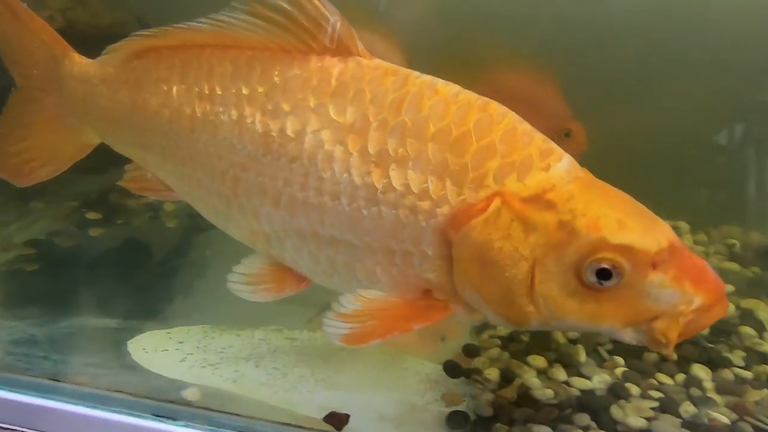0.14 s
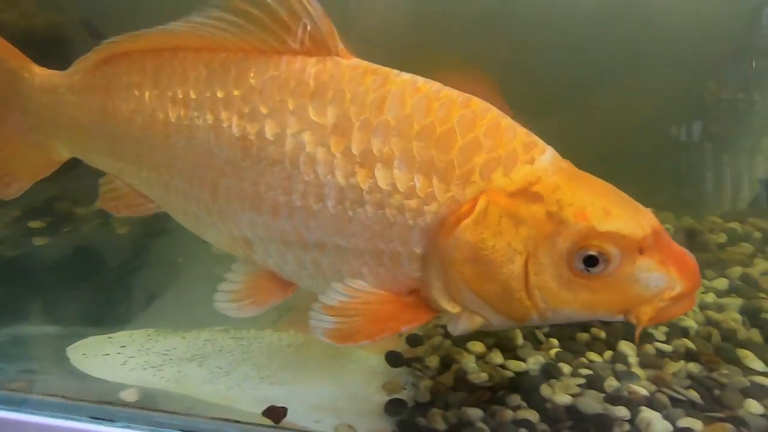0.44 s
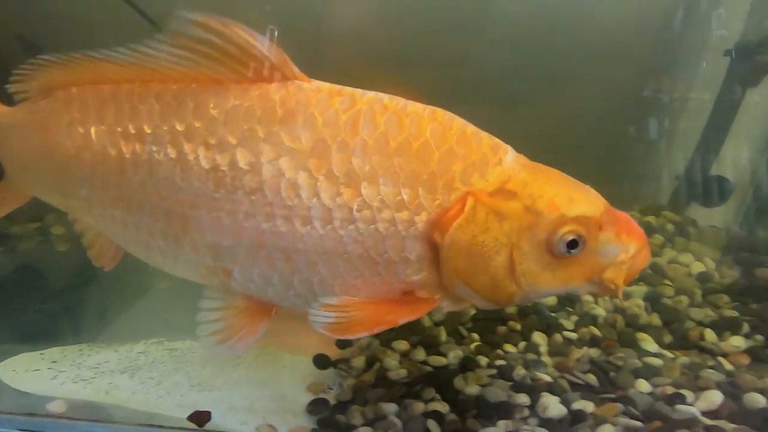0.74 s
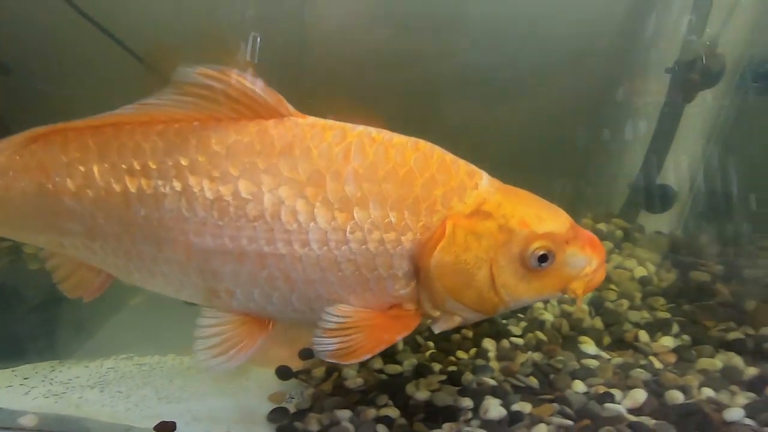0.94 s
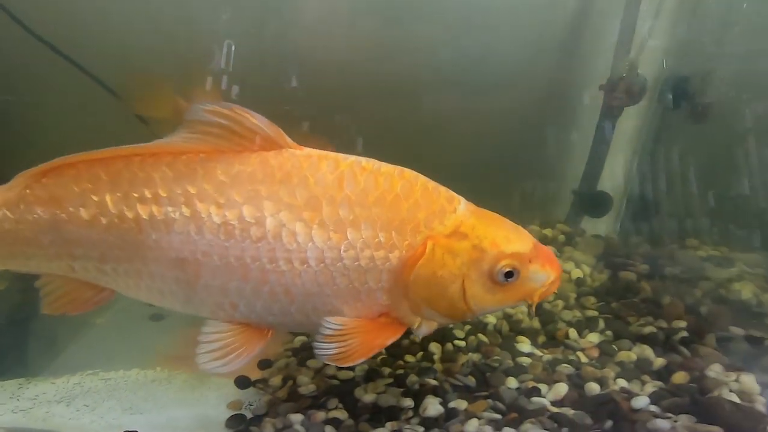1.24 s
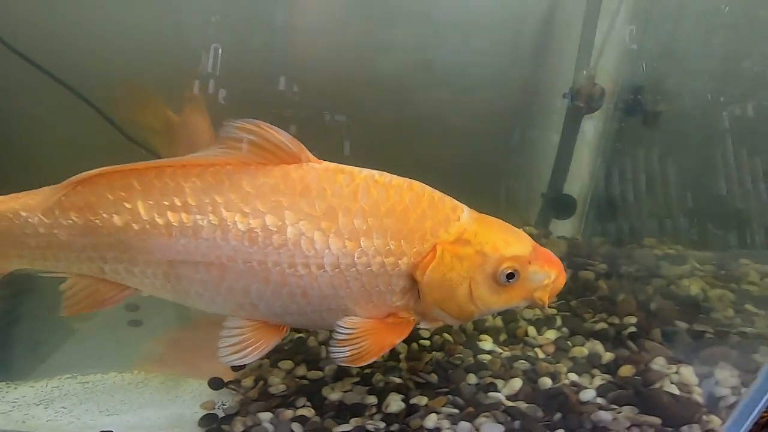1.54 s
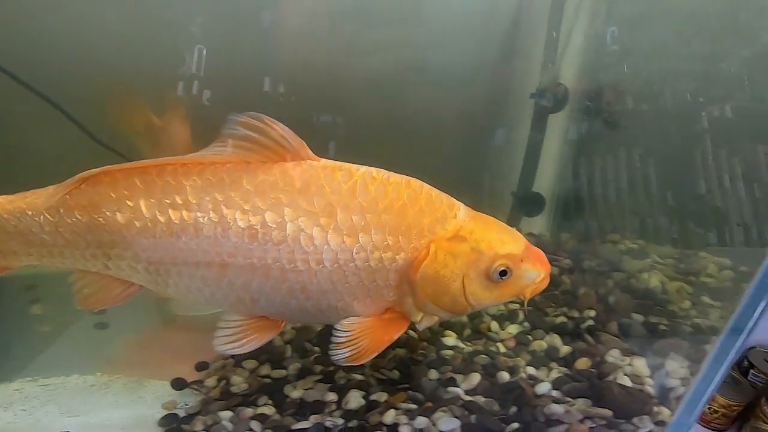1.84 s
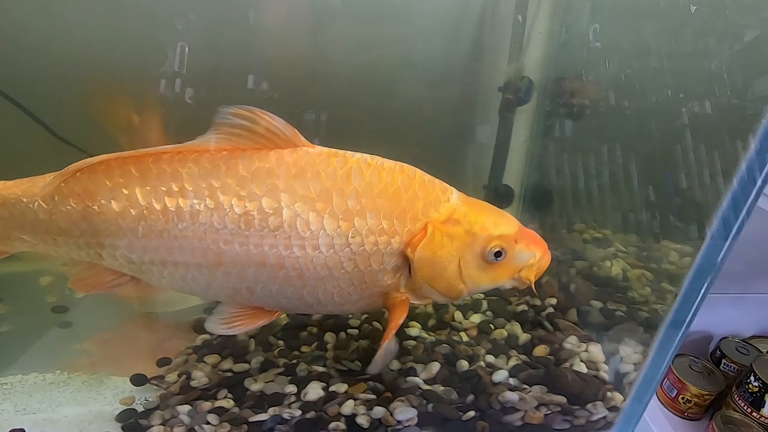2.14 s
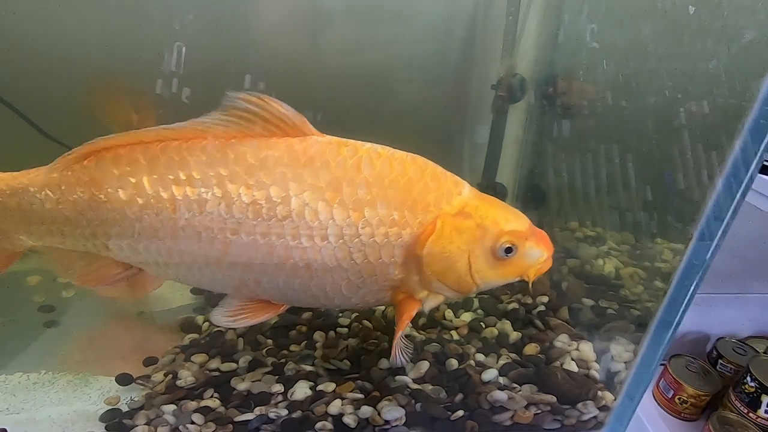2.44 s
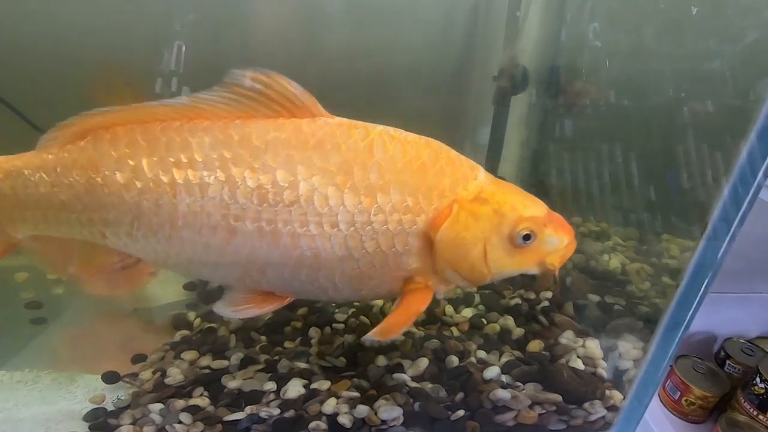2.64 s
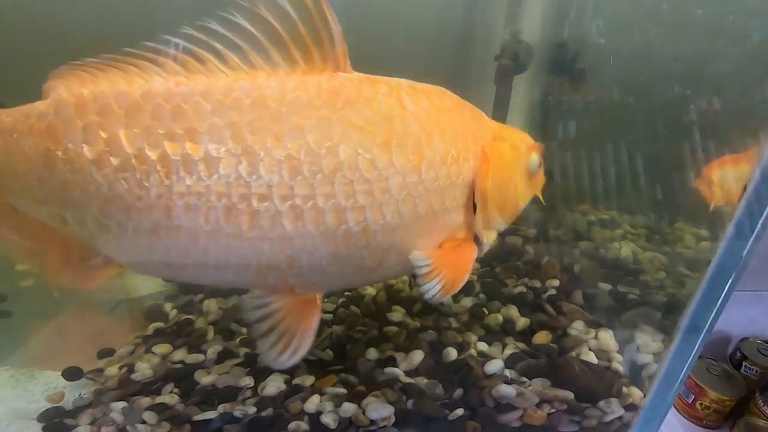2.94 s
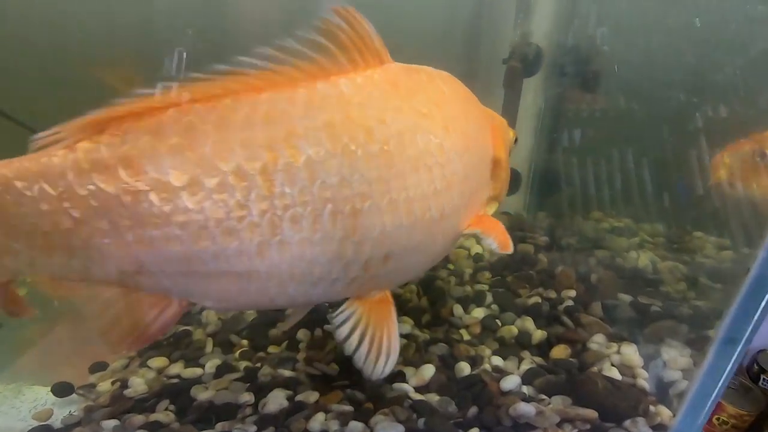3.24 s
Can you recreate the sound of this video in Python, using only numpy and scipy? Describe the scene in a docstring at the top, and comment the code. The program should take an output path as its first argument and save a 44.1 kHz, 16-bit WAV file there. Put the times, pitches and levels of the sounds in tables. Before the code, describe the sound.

Aquarium water bubbles steadily, with low gurgles and small plips at the surface, over an air pump's low hum and a faint hiss. A low drone fades early, and one soft thump comes near the end.

```python
"""A steady hum is heard first: an aquarium air pump vibrating at multiples of the mains rate, with its
motor turning underneath. Bubbles ring as small oscillators: large ones gurgle low in the tank, small
ones patter at the surface and, like the drops, excite the modes of the air space above the water.
Air hisses in step with the pump and whistles faintly now and then. A low drone sinks away in the first
second, with a tiny tick as it fades; one soft thump comes near the end."""
import sys
import numpy as np
from scipy import signal
from scipy.fft import rfft, irfft
from scipy.io import wavfile

SR = 44100
rng = np.random.default_rng(int(sys.argv[2]) if len(sys.argv) > 2 else 0)


def transcribe(u):
    """Save the signal u as a 16-bit wav file named by the first command-line argument.

    u: samples, shape (n,) or (channels, n), limited to [-1, 1]; the rate is SR.
    q: integer samples, one column per channel.
    """
    v = np.clip(np.atleast_2d(u).T, -1, 1)
    q = np.round(v * 32767).astype(np.int16)
    wavfile.write(sys.argv[1], SR, q)


N = 149940
TIME = np.arange(N) / SR
MAINS_HZ, SHAFT_HZ = 50.0, 24.437
PLIP_RISE_S, NEAR_WET_DB = .00088, -7  # shared by plips and drops

# The main hum. Each row: time in seconds, level in dB.
HUM_LEVEL = [(0, -35.5), (.6, -35), (1.6, -34.5), (2.5, -34.3), (3.0, -33.5), (3.4, -34)]
# Weaker pump tones. Each row: multiple of the mains rate, level in dB.
PUMP_PARTIALS = [(3, -48.5), (4, -58.5), (5, -57), (6, -62), (7, -65.5), (9, -67), (10, -68), (12, -81.5),
                 (15, -70.5), (21, -83), (22, -69)]
# Motor tones. Each row: multiple of the shaft rate, level in dB.
MOTOR_PARTIALS = [(3, -61.5), (5, -52.5), (9, -56), (12, -64), (13.5, -66), (15, -62), (17, -72.5),
                  (17.5, -89), (21.5, -83), (23.5, -77), (26, -71.5), (26.5, -68), (27, -75.5)]
# The drone's lower partial. Each row: time in seconds, frequency in Hz, level in dB.
DRONE_GLIDE = [(0, 157.5, -47), (.2, 151.6, -41.5), (.45, 145.2, -39), (.68, 136.5, -47),
               (0.851, 136.5, -54), (1.1, 136, -86)]

# Spectra of gurgle, surface water and hiss. Each row: frequency in Hz, relative density in dB.
GURGLE_SPECTRUM = [(20, -28), (44, -6), (54, -17.5), (85, -12.5), (115, -2), (146, -3.5), (168, -3),
                   (195, 0.5), (235, -10), (280, -12.5), (370, -14), (420, -18), (600, -19.5), (1200, -53)]
WATER_SPECTRUM = [(250, -21), (450, -9.5), (560, -21), (660, -3), (980, -4.5), (1220, -2), (1550, -1.5),
                  (1720, -2), (1980, -3), (2350, -2.5), (2650, -6), (3200, -21), (4200, -18), (5500, -25),
                  (8000, -28), (11000, -37), (15000, -44)]
HISS_SPECTRUM = [(3000, -4), (5500, -16), (6800, -8), (7900, -3.5), (9000, -1), (9700, -6), (10500, -13),
                 (11300, -26), (12300, -24), (14300, -32), (15000, -27)]
# Their envelopes. Each row: time in seconds, level in dB.
GURGLE_ENVELOPE = [(0, -42.5), (.7, -45.5), (.78, -43.5), (1.2, -45), (1.5, -48.5), (2.1, -46), (2.4, -50),
                   (3.4, -44)]
WATER_ENVELOPE = [(0, -48), (.07, -47.5), (.12, -46), (.27, -47.5), (.55, -46), (.68, -49.5), (.8, -45.5),
                  (.95, -47.5), (1.2, -45.5), (1.5, -48), (1.95, -47.5), (2.3, -47), (2.43, -49),
                  (2.63, -46.5), (3.05, -46), (3.3, -45.5), (3.4, -47)]
HISS_ENVELOPE = [(0, -55.5), (1.0, -55.5), (2.0, -55.5), (2.4, -57), (2.9, -55), (3.4, -56.5)]
# Their likeness at the two ears. Each row: frequency in Hz, correlation from -1 to 1.
GURGLE_COHERENCE = [(30, .5), (80, .5), (130, .78), (220, .85), (360, .74), (550, .6)]
WATER_COHERENCE = [(400, .6), (700, .2), (1000, .12), (1400, .42), (2300, .54), (3300, .64), (5500, .3),
                   (9000, 0)]
HISS_COHERENCE = [(4000, 0.82), (6500, 0.29), (8000, 0), (14000, 0)]
# Their lean to one side. Each row: frequency in Hz, left over right in dB.
GURGLE_PAN = [(40, 6), (80, 5), (130, -10.5), (220, -1), (400, 1)]
WATER_PAN = [(300, -1.6), (600, -0.56), (1000, 1.7), (1400, 1.3), (2000, 0), (2600, 0.65), (4000, 0.53)]
HISS_PAN = [(4000, -4), (6700, -2), (7400, -2), (8600, -5.5), (9300, 1), (14000, -1.5)]

# Modes of the air space above the water. Each row: frequency in Hz, width in Hz, relative level in dB.
CAVITY_MODES = [(1242, 83, -2), (1473, 86, -1), (1826, 31, -8), (2094, 26, -1), (2384, 27, -4)]
# Hollow rings of the splashing water. Each row: frequency in Hz, width in Hz, peak time in seconds,
# Gaussian spread in seconds, peak level in dB.
HOLLOW_RINGS = [(1245, 134, 3.114, 0.15, -49), (1160, 68, 0.38, 0.2, -59), (1350, 190, 2.76, 0.43, -60),
                (2300, 56, 0.57, 0.071, -58.5), (2180, 76, 3.17, 0.092, -54), (2350, 600, 0.14, 0.023, -55)]
# Louder small bubbles. Each row: start in seconds, starting frequency in Hz, strength in dB.
SMALL_BUBBLES = [(.046, 1230, -33), (0.177, 1200, -37), (.298, 1610, -40), (.308, 1760, -40),
                 (.613, 2290, -41.5), (.735, 1870, -40), (0.949, 1240, -39.5), (1.08, 2440, -40),
                 (1.143, 1525, -35.5), (1.727, 1700, -43), (1.941, 2420, -39), (1.944, 2120, -35),
                 (1.958, 1880, -36.5), (2.209, 1530, -38), (2.31, 2565, -42), (2.318, 2720, -45),
                 (2.53, 1390, -39), (2.889, 1870, -42), (3.02, 1825, -39), (3.08, 1245, -37),
                 (3.149, 1050, -36.5), (3.36, 2100, -38)]
# Drops landing. Each row: start in seconds, strength in dB.
DROP_IMPACTS = [(.177, -46), (.75, -50), (.809, -41), (1.199, -39.5), (1.28, -44.5), (1.606, -46),
                (3.021, -41.5), (3.277, -44)]
# Thin whistles. Each row: start and length in seconds, first, middle and last frequency in Hz,
# level in dB, left over right in dB.
WHISTLE_GLIDES = [(0.217, .18, 10850, 10050, 9700, -76, -3), (0.416, 0.47, 9400, 9100, 8900, -74, -12),
                  (2.567, 0.17, 9700, 10260, 11000, -72.5, -4), (2.72, .06, 10700, 11400, 12600, -77, -2),
                  (2.735, .072, 9350, 9750, 9400, -65.5, 0), (2.904, 0.25, 9700, 10370, 10550, -73, -7),
                  (2.96, .2, 12350, 12700, 13150, -80, -1), (3.14, .11, 13100, 12000, 11800, -77, -1),
                  (3.265, 0.088, 11300, 10200, 9500, -70, -6)]
# Single large bubbles. Each row: start in seconds, starting frequency in Hz, strength in dB.
LARGE_BUBBLES = [(0.691, 208, -26.5), (1.03, 192, -32), (1.23, 185, -25), (1.435, 187, -33),
                 (1.63, 205, -32), (1.705, 188, -24), (2.099, 255, -29.5), (2.578, 182, -26.5),
                 (3.134, 185, -28.5)]


def amp(db):
    """Amplitude grows tenfold for every 20 dB."""
    return 10 ** (np.asarray(db) / 20)


def unit(x):
    """Normalisation to an rms of 1."""
    return x / np.sqrt(np.mean(x ** 2) + 1e-20)


def at_hz(table, hz):
    """Interpolation on a logarithmic frequency axis."""
    f, value = np.transpose(table)
    return np.interp(np.log(hz + 1), np.log(f + 1), value)


def envelope(table):
    """Gain over time, interpolated in decibels."""
    return amp(np.interp(TIME, *np.transpose(table)))


def add(mix, start_s, sound):
    """Superposition: a sound joins the mix at its start time."""
    part = mix[..., max(round(start_s * SR), 0):][..., :sound.shape[-1]]
    part += sound[..., :part.shape[-1]]


def drift(rate_hz):
    """Low-pass filtered noise gives a random fluctuation of rms 1."""
    hz = np.fft.rfftfreq(N, 1 / SR)
    low_pass = np.exp(-(hz / rate_hz) ** 2) * (hz > 0)
    return unit(irfft(rfft(rng.standard_normal(N)) * low_pass, N))


def colour(pair, spectrum, coherence):
    """Filtering shapes two independent signals; their sum and difference set the coherence."""
    hz = np.fft.rfftfreq(N, 1 / SR)
    a, b = rfft(pair) * amp(at_hz(spectrum, hz))
    same = np.clip(at_hz(coherence, hz), -1, 1)
    mid, side = a * np.sqrt(1 + same), b * np.sqrt(1 - same)
    return unit(irfft([mid + side, mid - side], N))


def pan(pair, balance):
    """A level difference between the ears leans each frequency to one side."""
    db = at_hz(balance, np.fft.rfftfreq(N, 1 / SR))
    return unit(irfft(rfft(pair) * amp([db / 2, -db / 2]), N))


def resonate(pair, centre_hz, width_hz):
    """Two equal resonators in cascade pass one band, scaled to rms 1."""
    hz = np.fft.rfftfreq(N, 1 / SR)
    return unit(irfft(rfft(pair) / (1 + 1j * (hz - centre_hz) / width_hz) ** 2, N))


def room(pair, wet_db, t60_s=.28):
    """Reverberation: the shop's diffuse reflections add an exponentially decaying tail."""
    t = np.arange(SR // 2) / SR
    tail = rng.standard_normal((2, len(t))) * amp(-60 * t / t60_s) * (t > .003)
    tail /= np.linalg.norm(tail, axis=1, keepdims=True)
    return pair + amp(wet_db) * signal.fftconvolve(pair, tail, axes=1)[:, :N]


def partials(base_hz, table, waver_db, spread_rad):
    """Tones at multiples of one rate; the phase difference between the ears grows with order."""
    out = np.zeros((2, N))
    for order, db in table:
        offset = np.array([[1], [-1]]) * min(spread_rad * order, np.pi / 4) * rng.choice([-1, 1])
        gain = amp(db + waver_db * drift(16))
        out += gain * np.sin(2 * np.pi * (order * base_hz * TIME + rng.random()) + offset)
    return np.sqrt(2) * out


def pump(peak_s=.0028):
    """Forced vibration: the pump hums at twice the mains rate, with weaker harmonics and motor tones."""
    hum = np.sqrt(2) * envelope(HUM_LEVEL) * np.cos(2 * np.pi * 2 * MAINS_HZ * (TIME - peak_s))
    harmonics = partials(MAINS_HZ, PUMP_PARTIALS, waver_db=-.5, spread_rad=.04)
    motor = partials(SHAFT_HZ, MOTOR_PARTIALS, waver_db=-.2, spread_rad=.022)
    return hum * amp([[-.32], [.32]]) + harmonics + motor


def drone(upper_ratio=1.37, upper_db=-6.5):
    """Two inharmonic partials sink and fade; random phase modulation makes them unsteady."""
    times, hz, db = np.transpose(DRONE_GLIDE)
    phase = 2 * np.pi * np.cumsum(np.interp(TIME, times, hz)) / SR
    lower = np.sin(phase + .13 * drift(6))
    upper = amp(upper_db) * np.sin(upper_ratio * phase + .29 * drift(3.8))
    return amp(np.interp(TIME, times, db)) * (lower + upper)


def bubble(hz, decay_s, chirp=.04):
    """A bubble is a damped oscillator, its air the spring and the water the mass; its pitch creeps up."""
    t = np.arange(0, 7 * decay_s, 1 / SR)
    return np.exp(-t / decay_s) * np.sin(2 * np.pi * hz * t * (1 + chirp * t / t[-1]))


def swarm(low_hz, high_hz, per_s, spread_db, decay_cycles, sizes):
    """A Poisson process sets bubbles of many sizes ringing, with even power per Hz."""
    out = np.zeros((2, N))
    for hz in np.geomspace(low_hz, high_hz, sizes):
        births = rng.random((2, N)) < per_s / sizes / 2 / SR
        strength = amp(spread_db * np.minimum(rng.exponential(1, (2, N)), 4))
        rings = signal.oaconvolve(births * strength, bubble(hz, decay_cycles / hz)[None], axes=1)
        out += np.sqrt(hz) * unit(rings[:, :N])
    return unit(out)


def gurgle():
    """Large bubbles resonate low; heavily damped and mixed with noise, they merge into a rumble."""
    bubbles = swarm(72, 594, per_s=1100, spread_db=.9, decay_cycles=2.87, sizes=12)
    noise = amp(-6.5) * rng.standard_normal((2, N))
    rumble = colour(bubbles + noise, GURGLE_SPECTRUM, GURGLE_COHERENCE)
    return envelope(GURGLE_ENVELOPE) * pan(rumble, GURGLE_PAN)


def surface(wash_share=.44, cavity_db=-17, flicker_db=.35):
    """Small bubbles patter over a wash of noise, and cavity resonance makes the water ring hollow."""
    bubbles = swarm(546.2, 5950, per_s=1800, spread_db=2, decay_cycles=10.4, sizes=36)
    patter = colour(room(bubbles, wet_db=-1), WATER_SPECTRUM, WATER_COHERENCE)
    wash = colour(rng.standard_normal((2, N)), WATER_SPECTRUM, WATER_COHERENCE)
    water = np.sqrt(1 - wash_share) * patter + np.sqrt(wash_share) * wash
    ringing = sum(amp(cavity_db + db) * resonate(water, hz, width) for hz, width, db in CAVITY_MODES)
    flicker = amp(flicker_db * drift(21))
    out = envelope(WATER_ENVELOPE) * pan((water + ringing) * flicker, WATER_PAN)
    trickle = colour(rng.standard_normal((2, N)), WATER_SPECTRUM, WATER_COHERENCE)
    for hz, width, peak_s, spread_s, db in HOLLOW_RINGS:
        swell = np.exp(-.5 * ((TIME - peak_s) / spread_s) ** 2)
        out += amp(db) * swell * resonate(trickle, hz, width)
    return out


def air_hiss(depth=.17, peak_s=.0054, flicker_db=.9):
    """Amplitude modulation: the noise of escaping air swells with every stroke of the pump."""
    hiss = pan(colour(rng.standard_normal((2, N)), HISS_SPECTRUM, HISS_COHERENCE), HISS_PAN)
    stroke = 1 + depth * np.cos(2 * np.pi * MAINS_HZ * (TIME - peak_s))
    return hiss * stroke * envelope(HISS_ENVELOPE) * amp(flicker_db * drift(22))


def single_bubbles(table, rise_s, decay_s):
    """Free oscillation: each bubble builds up and rings out near its natural frequency."""
    out = np.zeros((2, N))
    for start, hz, db in table:
        ring = bubble(hz, decay_s)
        attack = 1 - np.exp(-TIME[:len(ring)] / rise_s)
        add(out, start, amp(db) * attack * ring)
    return out


def plips():
    """A small bubble resonates high: each gives one short, clear note."""
    return room(single_bubbles(SMALL_BUBBLES, PLIP_RISE_S, decay_s=.0051), NEAR_WET_DB)


def drops():
    """Impulse excitation: a landing drop rings all the tank's modes, and the wider ones die sooner."""
    out, t = np.zeros((2, N)), TIME[:SR // 8]
    attack = 1 - np.exp(-t / PLIP_RISE_S)
    for start, strength_db in DROP_IMPACTS:
        for hz, width, db in CAVITY_MODES:
            ring = np.exp(-np.pi * width * t) * np.sin(2 * np.pi * (hz * t + rng.random()))
            add(out, start, amp(strength_db + db) * attack * ring)
    return room(out, NEAR_WET_DB)


def whistles(waver=.005, roughness=.011, flutter_db=3):
    """Faint, high whistles of air glide; random frequency and amplitude modulation make them twitter."""
    out = np.zeros((2, N))
    for start, length, first, middle, last, db, lean_db in WHISTLE_GLIDES:
        progress = np.linspace(0, 1, round(length * SR))
        glide_hz = np.polyval(np.polyfit([0, .5, 1], [first, middle, last], 2), progress)
        detune = (waver * drift(39) + roughness * drift(590))[:len(progress)]
        tone = np.sin(2 * np.pi * np.cumsum(glide_hz * (1 + detune)) / SR)
        swell = np.sqrt(2 * abs(np.sin(np.pi * progress)))
        flutter = amp(flutter_db * drift(70)[:len(progress)])
        add(out, start, swell * flutter * tone * amp([[db + lean_db / 2], [db - lean_db / 2]]))
    return out


def glugs():
    """A large bubble resonates low: each sounds as it breaks from the air line."""
    return single_bubbles(LARGE_BUBBLES, rise_s=.012, decay_s=.013)


def tick(start_s=.773, decay_s=.0023, db=-50):
    """A high band of noise that decays in milliseconds is heard as one tiny, bright tick."""
    out, t = np.zeros((2, N)), TIME[:SR // 20]
    burst = resonate(rng.standard_normal((2, N)), centre_hz=6200, width_hz=1100)[:, :len(t)]
    add(out, start_s, amp(db) * burst * np.exp(-t / decay_s))
    return out


def thump(start_s=2.9215, hz=134.5, decay_s=.0059, db=-27.5):
    """Heavy damping ends a low tone within a few cycles, leaving one dull bump."""
    out, t = np.zeros(N), TIME[:SR // 8]
    swell = t / decay_s * np.exp(1 - t / decay_s)
    add(out, start_s, -amp(db) * swell * np.cos(2 * np.pi * hz * t))
    return out


def scene():
    """Superposition: the pressures of all the sources add at each ear."""
    pump_and_drone = pump() + drone()
    water = gurgle() + glugs() + surface() + plips() + drops()
    return pump_and_drone + water + tick() + thump() + air_hiss() + whistles()


def record(dry, low_cut_hz=47, edge_hz=14900):
    """Band limiting: steep filters weaken the deepest bass and remove the highest treble."""
    hz = np.fft.rfftfreq(N, 1 / SR)
    bass_shelf = 1 - .9 / (1 + (hz / low_cut_hz) ** 12)
    low_pass = signal.firwin(511, edge_hz, window=("kaiser", 9), fs=SR)
    return signal.oaconvolve(irfft(rfft(dry) * bass_shelf, N), low_pass[None], "same")


dry = scene()
out = record(dry)
transcribe(out)
```